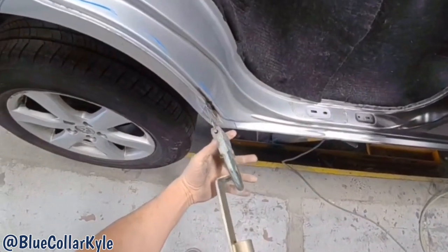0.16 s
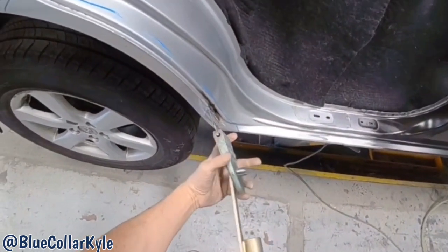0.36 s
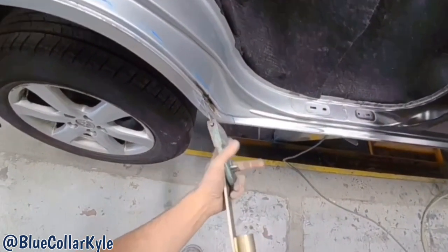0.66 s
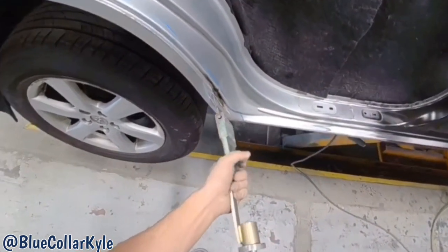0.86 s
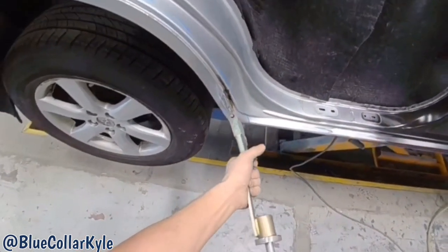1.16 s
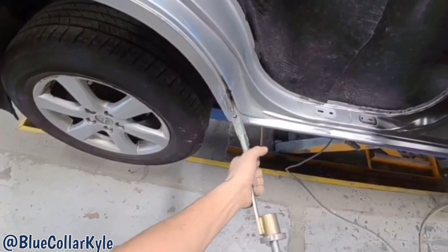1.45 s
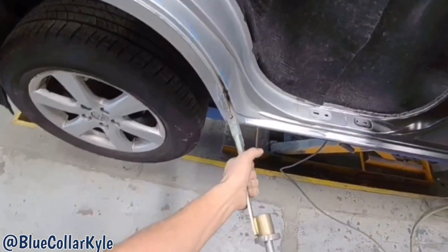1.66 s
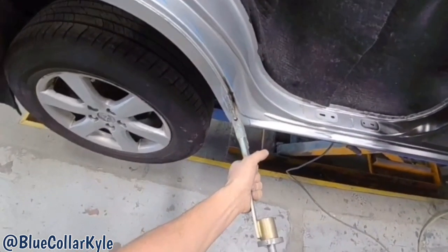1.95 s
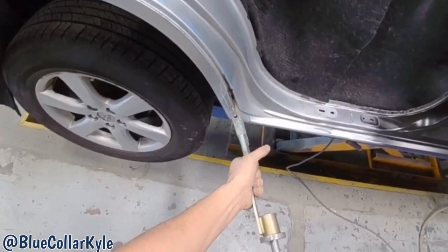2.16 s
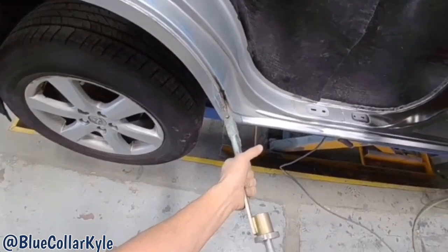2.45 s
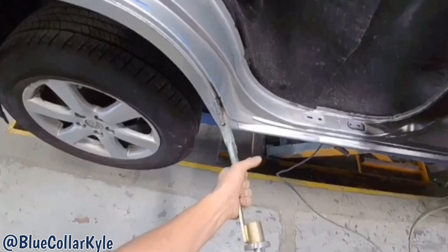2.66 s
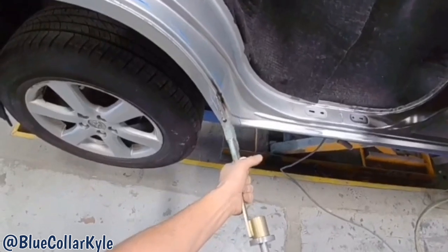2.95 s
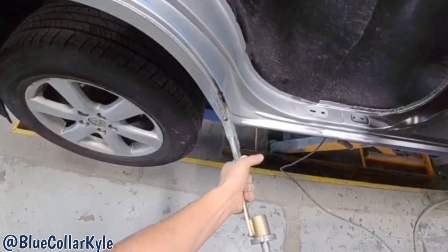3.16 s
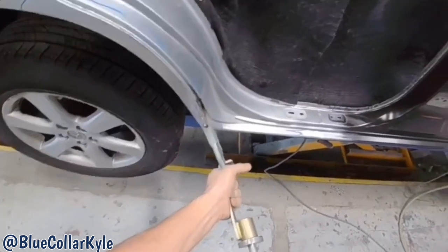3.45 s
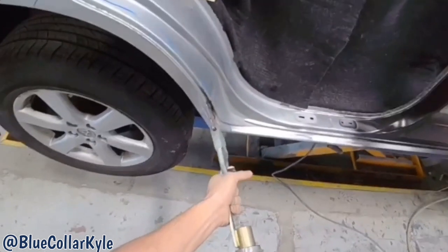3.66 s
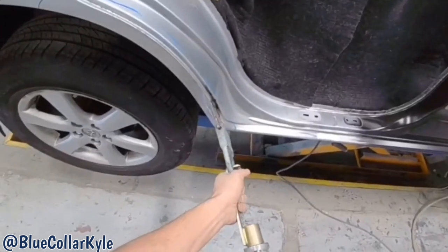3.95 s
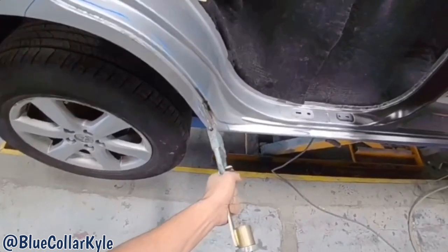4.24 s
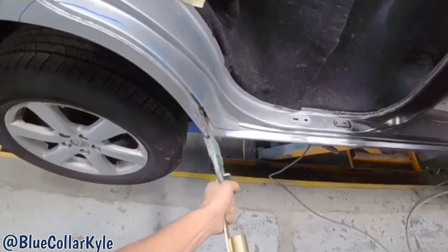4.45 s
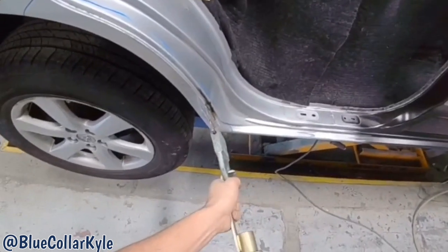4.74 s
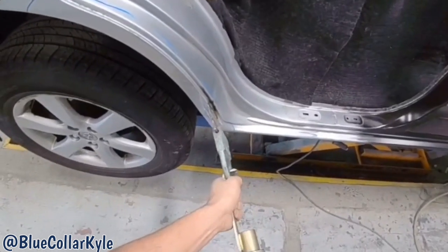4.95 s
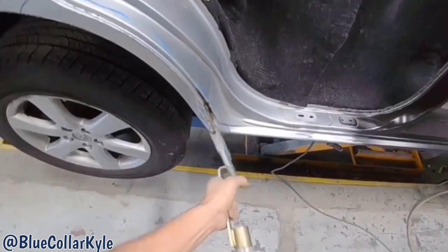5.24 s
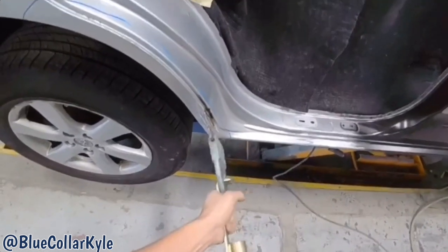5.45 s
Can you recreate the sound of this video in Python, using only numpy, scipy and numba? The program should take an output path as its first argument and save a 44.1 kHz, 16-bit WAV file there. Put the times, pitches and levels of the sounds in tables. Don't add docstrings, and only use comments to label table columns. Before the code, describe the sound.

Light metallic ticks and firmer clicks come first as a pulling tool is hooked to sheet metal. Five sharp, heavy clanks follow at steady intervals, each led by a quick gritty scrape and trailed by clatter, low panel boom and hard-walled echo. The close microphone overloads on the blows; distant machinery hum drops after the first one.

```python
import sys
import numpy as np
from scipy import signal
from scipy.fft import rfft, irfft, next_fast_len
from scipy.io import wavfile
from scipy.ndimage import uniform_filter1d
from numba import njit

SR = 44100
rng = np.random.default_rng(int(sys.argv[2]) if len(sys.argv) > 2 else 0)


def bounce(signal):
    frames = np.transpose(np.atleast_2d(signal))
    limited = np.clip(frames, -1, 1)
    pcm = np.round(limited * 32767).astype(np.int16)
    wavfile.write(sys.argv[1], SR, pcm)


def volts(x):
    e = np.asarray(x, float) / 20
    return 10 ** e


N = 246959

# [t/s, rod level/dB, panel level/dB, crack level/dB, clink f/Hz]
BLOWS = [
    (1.4424, 3.5, -9, -11, 4470),
    (2.3392, 4.5, -9.5, -8.5, 8220),
    (3.2172, 4.5, -9, -10.5, 4700),
    (4.127, 3.5, -11.5, -9.5, 5500),
    (5.057, -1.5, -8.5, -8, 6940),
]
# [t/s, rod level/dB, panel level/dB, crack level/dB, clink f/Hz]
RATTLES = [(1.562, -14, -17, -15, 7240), (1.583, -5, -41, -22.5, 7700), (1.610, -20, -53.5, -53, 3800),
           (2.209, -24, -33, -55, 5680), (2.500, -7, -15.5, -14, 7450), (2.513, -28, -25.5, -18, 10500),
           (2.597, -51.5, -48.5, -25.5, 5090), (3.421, -11.5, -17.5, -19, 5140),
           (3.452, -37, -38.5, -31, 4930), (3.489, -19.5, -38.5, -28.5, 4430), (4.956, -60, -44, -40, 5560),
           (5.146, -36, -22, -22, 9970), (5.160, -17.5, -27, -20, 5900)]
# [t/s, rod level/dB, panel level/dB, crack level/dB, clink f/Hz]
HOOK_TAP = [
    (4.216, -28, -14.5, -20, 3400),
]
# [t/s, rod level/dB, panel level/dB, crack level/dB, clink f/Hz]
CLICKS = [
    (.279, -33, -31.5, -38.5, 2820),
    (.296, -16.5, -24, -53, 2040),
    (.372, -16, -10.5, -24.5, 3930),
    (.392, -29, -32, -34.5, 2440),
    (.423, -36, -27, -40, 8500),
    (.806, -23, -33, -45, 5730),
    (.408, -11.5, -20, -34.5, 2940),
    (.855, -8.5, -25, -31, 1400),
]
# [t/s, rod level/dB, panel level/dB, crack level/dB, clink f/Hz]
JINGLES = [
    (.143, -45, -41, -32.5, 11100),
    (.169, -17.5, -28.5, -23, 2700),
]
# [rod level/dB, panel level/dB, crack level/dB, clink f/Hz]
TAUT_TICK = (-27, -29.5, -36, 2598)

# [f/Hz, level/dB, time to fade by 60 dB/s]
ROD_TONES = [(1400, -28.5, 0.041), (1758, -9.5, 0.061), (1963, 5, 0.022), (2274, -10.5, 0.096),
             (2542, 3, 0.093), (3000, -29, 0.0098)]
# [f/Hz, level/dB, time to fade by 60 dB/s]
PANEL_TONES = [(93, -1.5, 0.04), (195.5, -0.5, 0.15), (235.2, -1.5, 0.098), (289.5, 1.5, 0.11),
               (353.2, -3.5, 0.077), (395.4, 3, 0.15), (464.6, -7, 0.6), (502.3, 8.5, 0.028),
               (562.6, -11.5, 0.6), (675, -0.5, 0.19), (820, -17, 0.28), (971, -17, 0.37),
               (1125, -9.5, 0.067), (1403, -10, 0.13)]
# [f/Hz, level/dB, time to fade by 60 dB/s]
BODY_TONES = [(47.4, -8.5, 0.39), (68, -5, .2), (126.2, 0.5, 0.28)]
# [f/Hz, level/dB, time to fade by 60 dB/s]
WEIGHT_TONES = [(4495, -8, .025), (5680, -8, .02), (7920, -8, .02), (11040, -12, .03), (13660, -28, .35),
                (13760, -33, .35), (14320, -26, .2), (14410, -23, .25)]
# [f/Hz, level/dB, time to fade by 60 dB/s]
HOOK_TONES = [(3300, -5, .4), (3327, 0, .4), (3362, -4, .4), (15200, -20, .06)]
# [f/Hz, level/dB, time to fade by 60 dB/s]
CLAMP_TONES = [(5100, -3, .07), (8600, -14, .12), (9600, -9, .12), (10450, 0, .09), (11150, -3, .1),
               (13900, -15, .1), (15500, -13, .05), (12640, -16, .4), (12700, -21, .4)]
# [f/Hz, level/dB per Hz]
CRACK_COLOUR = [(200, -41), (700, 0), (1400, -3.5), (2500, -6), (3200, -6), (5000, -5.5), (8000, -6),
                (11000, -11), (14500, -18.5), (16000, -51.5)]
# [f/Hz, level/dB per Hz]
TICK_COLOUR = [(300, -18.5), (1200, -2.5), (2600, -9), (3300, -2), (5500, -1.5), (7500, -8.5),
               (10500, -14.5), (13000, -30), (16000, -27.5)]

# [run-up/s, scrape level at full speed/dB]
THROWS = [
    (0.059, -34.5),
    (.14, -35),
    (.13, -37.5),
    (0.13, -34.5),
    (.08, -39.5),
]
# [middle t/s, half length/s, level/dB]
EASES = [
    (0.708, 0.044, -46.5),
    (1.979, .05, -45),
]
# [f/Hz, level/dB per Hz]
SCRAPE_COLOUR = [(400, -20.5), (1000, -13.5), (1900, -6.5), (2600, 4), (3200, -15.5), (4400, -9.5),
                 (5700, -11), (7000, -22.5), (8900, -22.5), (10000, -24.5), (12700, -26.5), (13400, -32),
                 (14400, -32), (15500, -28)]
# [f/Hz, width/Hz, level/dB]
SINGING = [(2600, 400, 2), (5700, 600, 0), (7300, 600, -3), (8900, 400, -3), (10500, 600, -6),
           (12650, 400, -8), (14350, 400, -7)]

# [f/Hz, time to fade by 60 dB/s]
HALL_FADE = [(60, 0.52), (200, 0.77), (600, 0.83), (2000, 1), (5000, 0.73), (10000, 0.28), (16000, .22)]
# [delay t/s, level/dB]
WALLS = [
    (0.02, -16.5),
    (.031, 5.5),
    (.047, -9),
]
# [f/Hz, level/dB per Hz]
SHOP_COLOUR = [(15, -51.5), (25, -34), (82, 0), (301, -12.5), (545, -17.5), (659, -16.5), (1230, -22),
               (1370, -20.5), (1790, -25), (2000, -20), (2760, -32), (4030, -39.5), (12900, -64.5),
               (16000, -86)]

SLACK_S = .0225
AIR_HZ = 14700


def strikes(events, bright, colour, crack_s, rod_db, panel_db, ring_db, crack_db, shiver_db, clink_db):
    near, far = np.zeros(N), np.zeros(N)
    t = np.arange(SR // 4) / SR
    fade = np.cos(np.pi / 2 * t / t[-1])
    snap = shape(1. * (np.arange(len(t)) == 30), colour) * (t < .005)
    snap = snap / np.max(snap)
    for s, rod, panel, top, clink_hz in events:
        noise = shape(rng.standard_normal(len(t)), colour)
        contacts = (rng.random(len(t)) < 400 / SR) * volts(2.5 * rng.standard_normal(len(t)))
        chatter = signal.lfilter([1], [1, -np.exp(-1 / (0.0034 * SR))], contacts)
        chatter = chatter * np.exp(-t / 0.05) * (1 - np.exp(-t / 0.004))
        shiver = volts(-3.5) * low(chatter * noise, AIR_HZ) + volts(4) * clatter(t, colour)
        crack = noise * np.exp(-t / crack_s) + volts(shiver_db) * shiver

        clank = volts(rod + rod_db) * ring(ROD_TONES, t, rise=0.00038, spread=0.033, count=7)
        boom = ring(PANEL_TONES, t, rise=0.0016, spread=0.0609, count=6)
        boom = boom + volts(-21.5) * ring(BODY_TONES, t, rise=0.0069, spread=0.12, count=1)
        boom = volts(panel + panel_db) * boom
        clink = .5 * ring([(clink_hz, 0, .02)], t, rise=.0002, spread=.02, count=3)
        rings = ring(bright, t, rise=0.00044, spread=0.0016, count=1) + volts(clink_db) * clink
        rings = volts(top + ring_db) * rings

        crack_gain = volts(top + crack_db)
        close = clank + boom + rings + crack_gain * (crack + volts(-8.0) * snap)
        sent = volts(-3.5) * clank * np.exp(-t / .004) + volts(-6.5) * rings + boom
        sent = sent + crack_gain * (0.21 * crack + 9 * snap)
        add(near, s - .0005, fade * close)
        add(far, s - .0005, fade * sent)
    return np.array([near, far])


def ring(modes, t, rise, spread, count):
    hz, db, t60 = np.repeat(np.transpose(modes), count, axis=1)
    level_chance, pitch_chance, phase = rng.standard_normal((3, len(hz)))
    turning = 2j * np.pi * hz * (1 + spread * pitch_chance)
    fading = np.log(1000) / np.clip(t60, .01, .4)
    sizes = volts(db + level_chance) * np.exp(1j * phase)
    y = spin(np.exp((turning - fading) / SR), sizes, np.zeros(len(hz), np.int64), count=len(t))
    y = (1 - np.exp(-t / rise)) * y
    return y / np.max(np.abs(y))


def clatter(t, colour):
    life_s, clink_s = 0.022, 0.009
    hz, db = np.transpose(colour)
    f = np.repeat(1200 * 11 ** rng.random(12), 14)
    sizes = volts(3 * rng.standard_normal(len(f)) + np.interp(f, hz, db)) + 0j
    poles = np.exp((2j * np.pi * f - 1 / clink_s) / SR)
    clinks = spin(poles, sizes, rng.integers(0, len(t), len(f)), count=len(t))
    return clinks * np.exp(-t / life_s) * (1 - np.exp(-t / .006))


@njit
def spin(poles, sizes, starts, count):
    y = np.zeros(count)
    for k in range(len(poles)):
        z, i = sizes[k], starts[k]
        while i < count and z.real * z.real + z.imag * z.imag > 1e-10:
            y[i] += z.imag
            z, i = z * poles[k], i + 1
    return y


def slide():
    speedup_db, taut_db = 10, 5.5
    t, thrown = np.arange(N) / SR, np.zeros(N)
    for (end, *_), (run, db) in zip(BLOWS, THROWS):
        taut_s = end - SLACK_S
        speed = np.clip(1 - (taut_s - t) / run, 0, 1)
        edges = np.clip(np.minimum(speed * run / .05, (end - .001 - t) / .002), 0, 1)
        thrown += volts(db - speedup_db * (1 - speed) + taut_db * (t > taut_s)) * edges
    eased = sum(volts(db) / (1 + ((t - mid) / half) ** 4) for mid, half, db in EASES)
    gain = thrown + eased

    rub = rng.standard_normal(N) * volts(2.2 * rng.exponential(size=N) + 3 * walk(60))
    grit = shape(rub, SCRAPE_COLOUR)
    dull = signal.sosfilt(signal.butter(2, 3500, fs=SR, output="sos"), grit)
    sing = sum(volts(db + 4 * walk(40)) * band(rub, hz, width / hz) for hz, width, db in SINGING)
    top = volts(-6.5) * gain * (grit - dull) * volts(1.3 * walk(26))
    top = top + volts(-17) * thrown * sing / np.std(sing)
    return gain * dull + top * (gain / volts(-31.5)) ** 0.22


def hall(x):
    t = np.arange(int(1.3 * SR)) / SR
    hz, t60 = np.transpose(HALL_FADE)
    noise = rng.standard_normal(len(t))
    tail = np.zeros(len(t))
    for f in 50 * 2 ** np.arange(0, 8.6, .5):
        fade_s = np.interp(np.log(f), np.log(hz), t60)
        tail += band(rng.standard_normal(len(t)), f, 0.35) * 1000 ** (-t / fade_s)
    tail = volts(-37.0) * tail * (1 - np.exp(-t / 0.0072))
    for lag, db in WALLS:
        tail = tail + volts(db - 34) * noise * (t > lag) * np.exp(-np.abs(t - lag) / 0.0031)
    tail = signal.lfilter(*signal.butter(1, 7200, fs=SR), tail)
    return signal.fftconvolve(x, low(tail, AIR_HZ))[:N]


def shop():
    fan_off_s, rundown_s = 1.76, 0.087
    fan = 1 / (1 + np.exp((np.arange(N) / SR - fan_off_s) / rundown_s))
    rumble_db = -49.5 + 8.5 * fan
    hum_db = -50.5 + 5.5 * fan
    air, out = shape(rng.standard_normal(N), SHOP_COLOUR), 0
    for hz in 30 * 2 ** np.arange(0, 9.1, .5):
        share = np.clip(np.log2(hz / 200), 0, 1)
        db = (1 - share) * (rumble_db + 11.0) + share * (hum_db + 14.0)
        flicker_db = (.6 + (1 - share)) * walk(12)
        out = out + band(air, hz, 0.44) * volts(db + flicker_db)
    return out


def shape(x, table):
    hz, db = np.transpose(table)
    n = next_fast_len(len(x))
    f = np.maximum(np.arange(n // 2 + 1) * SR / n, 1)
    gain = volts(np.interp(np.log(f), np.log(hz), db))
    y = irfft(rfft(x, n) * gain, n)[:len(x)]
    return y / np.sqrt(np.mean(y ** 2))


def band(x, hz, octaves):
    edges = np.clip(hz * 2 ** (np.array([-.5, .5]) * octaves), 10, .48 * SR)
    return signal.sosfilt(signal.butter(2, edges, "band", fs=SR, output="sos"), x)


def low(x, hz):
    return signal.sosfilt(signal.ellip(8, .2, 60, hz, fs=SR, output="sos"), x)


def walk(rate):
    k = int(SR / rate)
    steps = np.repeat(rng.standard_normal(N // k + 1), k)
    return 1.95 * uniform_filter1d(uniform_filter1d(steps, k), k)[:N]


def add(out, s, x):
    i = int(s * SR)
    out[i:i + len(x)] += x[:N - i]


def scene():
    taut = [(s - SLACK_S, *TAUT_TICK) for s, *_ in BLOWS]
    steel = strikes(BLOWS, WEIGHT_TONES, CRACK_COLOUR, crack_s=0.004, rod_db=0.19, panel_db=6.86,
                    ring_db=2.5, crack_db=1.57, shiver_db=-14.5, clink_db=0.0)
    steel = steel + strikes(RATTLES + taut, WEIGHT_TONES, CRACK_COLOUR, crack_s=0.0056, rod_db=-3.5,
                            panel_db=-0.0042, ring_db=-7.5, crack_db=-7.3, shiver_db=-14.5, clink_db=7.0)
    steel = steel + strikes(CLICKS, CLAMP_TONES[:-2], TICK_COLOUR, crack_s=.008, rod_db=-6.5, panel_db=0.97,
                            ring_db=-12.5, crack_db=1.5, shiver_db=-15.5, clink_db=26.6)
    steel = steel + strikes(JINGLES, CLAMP_TONES, TICK_COLOUR, crack_s=0.0093, rod_db=-8.5, panel_db=-1.7,
                            ring_db=0.17, crack_db=-2.5, shiver_db=-35.0, clink_db=5.3)
    steel = steel + strikes(HOOK_TAP, HOOK_TONES, CRACK_COLOUR, crack_s=.005, rod_db=-8.5, panel_db=2.0,
                            ring_db=-3.0, crack_db=-6.0, shiver_db=-14.0, clink_db=-3.0)
    near, far = steel + slide()
    return (near + hall(far) + shop())[None]


def top_cut(x):
    return signal.sosfilt(signal.butter(12, 16620, fs=SR, output="sos"), x)


def record(dry):
    x = signal.sosfilt(signal.butter(2, 50, "high", fs=SR, output="sos"), dry)
    x = np.tanh(x ** 3 / 1.8 + x)
    mix = np.clip(low(x, 15900), -1, 1)
    return top_cut(mix)


dry = scene()
out = record(dry)
bounce(out)
```